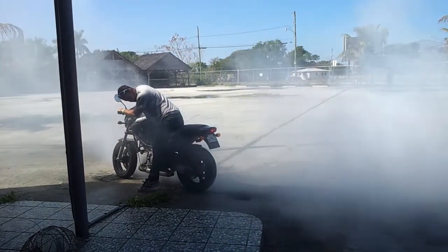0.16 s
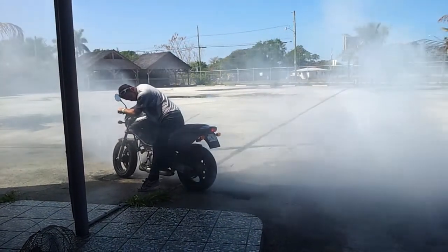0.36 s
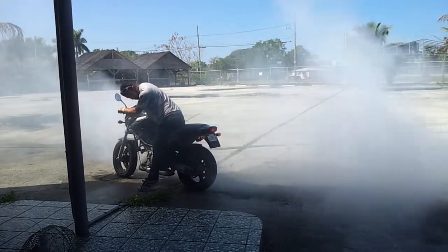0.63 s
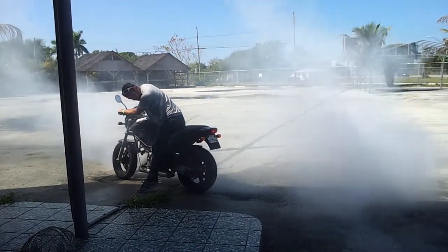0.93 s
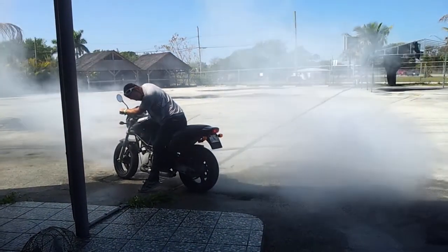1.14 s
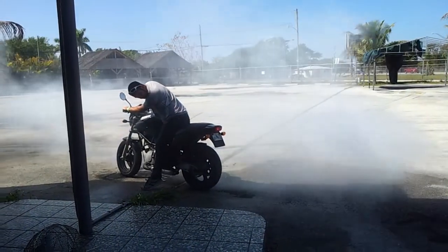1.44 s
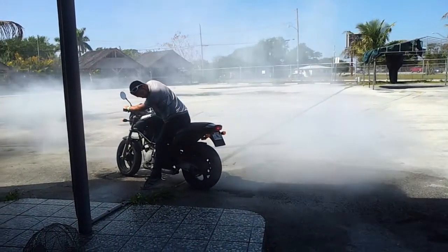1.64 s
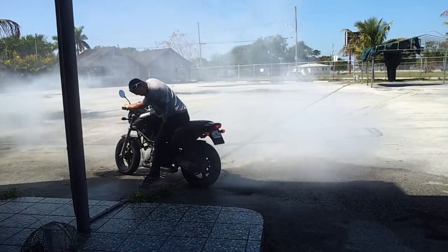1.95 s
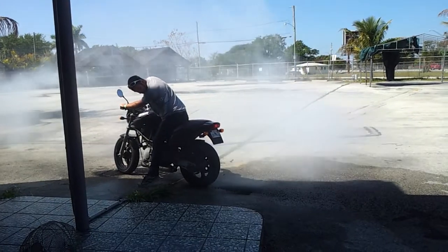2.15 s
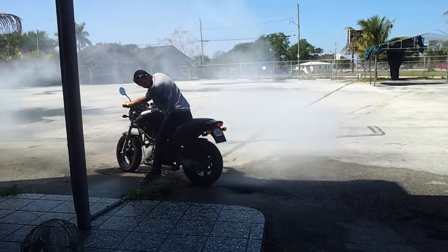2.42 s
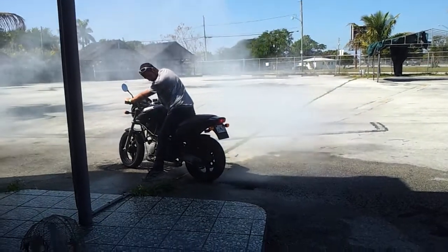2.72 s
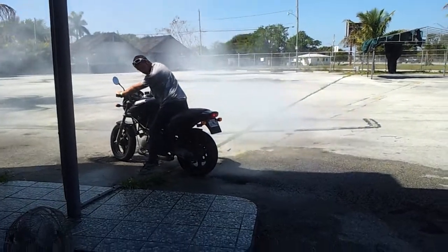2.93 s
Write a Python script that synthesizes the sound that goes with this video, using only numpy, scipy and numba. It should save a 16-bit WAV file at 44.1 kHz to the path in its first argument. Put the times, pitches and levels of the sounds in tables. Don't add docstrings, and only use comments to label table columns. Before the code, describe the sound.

A big motorcycle engine falls from a loud rev, with hollow exhaust drone and metallic clatter, then settles to an uneven thumping idle with small pops; close outdoor small-camera microphone, peaks distorting.

```python
import sys
import numpy as np
from scipy import signal
from scipy.fft import rfft, irfft
from scipy.io import wavfile
from scipy.ndimage import uniform_filter1d
from numba import njit

SR = 44100
rng = np.random.default_rng(int(sys.argv[2]) if len(sys.argv) > 2 else 0)


def how_loud(loudness_db):
    steps = np.asarray(loudness_db, float) / 20
    return 10 ** steps


def int16_out(signal):
    q = np.round(np.clip(np.atleast_2d(signal).T, -1, 1) * 32767)
    wavfile.write(sys.argv[1], SR, q.astype(np.int16))


N = 135828

# time_s, case_noise_db, burble_db, gas_hiss_db
EFFORT = [
    (0.0, -14.5, -2.5, -33),
    (.22, -20, -14, -35),
    (.45, -21, -14.5, -42),
    (.7, -23, -16, -46),
    (1.0, -22.5, -18.5, -57.5),
    (1.42, -25.5, -22, -63),
    (2.2, -25.5, -24.5, -72),
    (3.08, -23.5, -21.5, -95),
]
# centre_hz, width_hz, level_db
BURBLE_RESONANCES = [(76.8, 38.6, -6), (100.6, 14, -9), (168.8, 20.5, -2.5), (243.6, 35.7, -14.5),
                     (305.5, 37, -10.5)]
# centre_hz, width_hz, level_db
CASE_RESONANCES = [(545.4, 29, 11.5), (646.3, 61, 4), (703.5, 122, 4), (1380, 560, -4.5), (1904, 883, -4.5),
                   (2936, 1800, -27.5), (3954, 300, -10)]
# frequency_hz, density_db (per Hz)
CASE_NOISE = [(250, -27), (380, -16.5), (550, -1.5), (990, -8), (2040, -17.5), (2900, -25), (4340, -19),
              (7300, -30.5), (10000, -47)]
# time_s (peak 2.5 ms later), level_db, brightness_db
EARLY_PUFFS = [(0.0126, -26, 21), (0.0586, -29, 10), (0.0857, -17.5, 26), (0.142, -19.5, 25),
               (0.173, -19, 28), (0.2144, -29, 19), (0.258, -20.5, 25), (0.298, -25, 12), (0.3669, -26, 19),
               (0.45, -18.5, 26), (0.521, -19.5, 24.5), (0.565, -24.5, 27), (0.6294, -28, 6),
               (0.6757, -19, 23), (0.719, -27, -5), (0.763, -24.5, 24), (0.847, -17.5, 19),
               (0.938, -19, 26), (0.957, -23.5, 30), (1.034, -24.5, -43), (1.0524, -26, -25),
               (1.066, -27, -26), (1.1333, -25, 14), (1.1694, -27, -16), (1.2357, -23, -19),
               (1.2958, -22, -24), (1.345, -22.5, 17), (1.404, -33, -17), (1.455, -19.5, -14),
               (1.517, -28, -22)]
# time_s (peak 2.5 ms later), level_db, brightness_db
LATE_PUFFS = [(1.566, -26.5, -13), (1.632, -24, -24), (1.6795, -27, -16), (1.752, -33, 4),
              (1.7988, -27.5, -9), (1.8698, -17.5, 15), (1.918, -23, -9), (2.04, -18, 11),
              (2.0544, -34, -14), (2.105, -19.5, 12), (2.1522, -20, -25), (2.2132, -25.5, -23),
              (2.226, -31.5, -15), (2.2718, -17, 15), (2.385, -22.5, 12), (2.4506, -23.5, -20),
              (2.4927, -34.5, 7), (2.5034, -23.5, 8), (2.6195, -23, 18), (2.6858, -19, -26),
              (2.736, -19, -33), (2.8504, -22, -17), (2.919, -20.5, -15), (2.969, -22.5, -30),
              (3.023, -29, 0)]
# centre_hz, width_hz, level_db
PUFF_COLOUR = [(1450, 270, 6.5), (1959, 130, 8), (3400, 200, -10), (4300, 380, 0), (4200, 2200, -7),
               (6330, 1530, -7.5)]
# start_s, level_db
SLOWING_FIRINGS = [(.018, -5.5), (.045, -4.5), (.069, -5), (.092, -3), (.121, -6), (.146, -5), (.177, 0),
                   (.202, -11), (.234, -6), (.262, -2), (.294, -9), (.323, -6), (.358, -7.5), (.387, -6),
                   (.399, -5), (.416, -7), (.455, -3.5), (.485, -7.5), (.525, -5), (.568, -6.5), (.599, -8)]
# start_s, level_db
SETTLING_FIRINGS = [(0.644, -9), (0.68, -9.5), (0.721, -5.5), (0.768, -16), (0.805, -11), (0.846, -5),
                    (0.856, -11.5), (0.895, -13.5), (0.944, -7), (0.99, -14), (1.032, -4.5), (1.099, -6.5),
                    (1.13, -29), (1.188, -23), (1.238, -4), (1.297, -7.5), (1.342, -17), (1.406, -6.5),
                    (1.455, -7), (1.518, -10), (1.565, -11.5), (1.633, -7), (1.673, -11)]
# start_s, level_db
IDLE_FIRINGS = [(1.755, -39), (1.802, -9.5), (1.871, -4), (1.919, -18), (1.993, -11), (2.041, -6),
                (2.108, -6.5), (2.163, -11), (2.223, -6.5), (2.273, -6), (2.333, -15), (2.393, -18),
                (2.454, -6.5), (2.504, -6), (2.566, -12), (2.619, -15.5), (2.688, -5), (2.738, -9.5),
                (2.801, -14), (2.853, -8), (2.92, -6.5), (2.968, -9), (3.033, -13.5)]
# delay_ms, level_db
REFLECTIONS = [(0, 0), (9.6, -4), (15.6, -0.5), (21.8, -3), (27.8, -2.5), (39.6, -6.5), (44, -25),
               (55.5, -20), (62, -8)]
# pitch_hz, level_db, t60_s, rise_hz_per_s
CHAMBERS = [(69, -7.5, 0.16, 1), (167, -45, 0.036, 1.5), (292, -14, .2, 1000), (565, -20, 0.1, 0),
            (586, -46, 0.15, 0)]
# time_s, pitch_hz, ring_db, reflections_db
CHAMBER_SONG = [
    (0, 166, -2.5, -16),
    (.1, 176, -0.5, -19),
    (.2, 163, 0, -18),
    (.3, 156.4, -0.5, -1),
    (.4, 156, -2.5, -19),
    (.48, 162.7, 0, -12.5),
    (.6, 179.5, 0, -13),
    (.7, 161, -16, -1.5),
    (1.0, 164, -18, -1),
]
# start_s, level_db, pitch_hz
HIGH_PIPE_RINGS = [(1.0335, -23, 3340), (1.2969, -20, 3370), (1.4037, -19, 3320), (1.4525, -19, 3370),
                   (1.8701, -17, 3370), (2.0388, -23, 3310), (2.1056, -14.5, 3420), (2.2126, -22, 3500),
                   (2.2711, -29, 3530), (2.5028, -21, 3400), (2.6852, -18, 3270), (2.7352, -37, 3320),
                   (2.9181, -19, 3320)]
# start_s, level_db, pitch_hz
LOW_PIPE_RINGS = [
    (0.8454, -29, 2080),
    (1.2347, -19, 1910),
    (1.4525, -26, 2000),
    (2.1516, -10.5, 1960),
    (2.383, -12, 2050),
    (2.452, -17, 2110),
    (2.6852, -10, 1910),
    (2.9181, -26, 1900),
    (2.9696, -15, 2000),
]
# start_s, level_db
AFTERFIRE = [
    (1.8338, -15),
    (1.929, -15),
]
# frequency_hz, threshold_db (per bin)
MUTE_THRESHOLD = [(6300, -22), (7000, -19.5), (8500, -19), (10000, -19.5), (11300, -20.5), (13000, -24),
                  (14800, -18.5)]

TOP_HZ = 15700


@njit
def svf(x, hz, width):
    out = np.empty(len(x))
    band, low = 0., 0.
    g, k = np.tan(np.pi * hz / SR), width / hz
    for i in range(len(x)):
        v = (band + g * (x[i] - low)) / (1 + g * (g + k))
        band = 2 * v - band
        low = low + 2 * g * v
        out[i] = k * v
    return out


def unit(x):
    return x / np.sqrt(np.mean(x ** 2))


def resonate(x, table):
    total = np.zeros(len(x))
    for hz, width, db in table:
        once = svf(x, 1. * hz, 1.42 * width)
        total += how_loud(db) * svf(once, 1. * hz, 1.42 * width)
    return total


def spikes(start_s, level_db):
    out = np.zeros(N)
    at = np.clip((np.asarray(start_s) * SR).astype(int), 0, N - 1)
    np.add.at(out, at, how_loud(level_db))
    return out


def ring(x, kernel):
    return signal.fftconvolve(x, kernel)[:N]


def decay(s, t60_s):
    return 1000. ** (-s / t60_s)


def scatter(per_s, spread_db):
    chance, sign, size = rng.random((3, N))
    clicks = (chance < per_s / SR) * np.sign(sign - .5)
    return unit(clicks * how_loud(-spread_db * np.log(size + 1e-9)))


def walk(rate_hz):
    hold = int(SR / rate_hz)
    steps = np.repeat(rng.standard_normal(N // hold + 1), hold)
    return 1.64 * uniform_filter1d(uniform_filter1d(steps, hold), hold)[:N]


def effort(column):
    table = np.array(EFFORT)
    return how_loud(np.interp(np.arange(N) / SR, table[:, 0], table[:, column]))


def burble():
    fuel_pops = scatter(per_s=220, spread_db=1.0)
    return effort(column=2) * unit(resonate(fuel_pops, BURBLE_RESONANCES))


def cases(fire):
    beat_s, beat_depth = 0.016, 0.27
    clatter_db, broad_db = -6.5, 6.5
    s = np.arange(SR // 5) / SR
    swell = s / beat_s * np.exp(1 - s / beat_s)
    beat = ring(fire, swell) / effort(column=1)
    clatter = scatter(per_s=400, spread_db=2)
    drive = unit(rng.standard_normal(N) + how_loud(clatter_db) * clatter)
    hz, table = np.fft.rfftfreq(N, 1 / SR), np.array(CASE_NOISE)
    colour = how_loud(np.interp(np.log(hz + 1), np.log(table[:, 0]), table[:, 1], left=-60, right=-80))
    broad = unit(irfft(rfft(drive) * colour, N))
    body = unit(resonate(drive, CASE_RESONANCES)) + how_loud(broad_db) * broad
    unevenness = how_loud(0.74 * walk(13) + 0.85 * walk(70))
    return effort(column=1) * unit(body * (1 + beat_depth * unit(beat)) * unevenness)


def jet():
    top_fade_db_per_s = 13
    noise = rng.standard_normal(N)
    top = resonate(noise, [(11100, 1700, -6), (12900, 4600, 4)])
    top *= how_loud(-top_fade_db_per_s * np.arange(N) / SR)
    hiss = unit(resonate(noise, [(7700, 5300, 7.8)]) + top)
    flutter = how_loud(2.0 * walk(35) + 1.8 * walk(90))
    return effort(column=3) * hiss * flutter


def puffs():
    rise_s, peak_s, fall_s, tail_s = .003, .0025, 0.0021, 0.011
    tail_db, air_db, puff_db = 7.5, -38, -3
    time_s, level_db, brightness_db = np.array(list(EARLY_PUFFS) + list(LATE_PUFFS)).T
    s = np.arange(SR // 8) / SR - 3 * rise_s
    swell = np.exp(-.5 * (s / rise_s) ** 2)
    fall = np.exp(-s / fall_s) + how_loud(tail_db) * np.exp(-s / tail_s)
    shape = np.where(s < 0, swell, fall / (1 + how_loud(tail_db)))
    start_s = time_s + peak_s - 3 * rise_s
    hiss = unit(svf(resonate(rng.standard_normal(N), PUFF_COLOUR), 4280.0, 7700.0))
    air = unit(resonate(rng.standard_normal(N), [(12600, 4000, 0)]))
    hiss_gain = ring(spikes(start_s, level_db), shape)
    air_gain = ring(spikes(start_s, level_db + brightness_db + air_db), shape)
    return how_loud(puff_db) * (hiss * hiss_gain + air * air_gain)


def exhaust(firings):
    doublet_ms, lead_ms, ring_start_ms = 1.4, 5.0, 3.5
    thump_db = -2
    ms = np.arange(SR // 4) / SR * 1000

    def doublet(delay_ms, db):
        u = (ms - lead_ms - delay_ms) / doublet_ms
        return how_loud(db) * u * np.exp(.5 - u ** 2 / 2)

    direct, *later = [doublet(delay_ms, db) for delay_ms, db in REFLECTIONS]
    s = np.maximum(ms - ring_start_ms, 0) / 1000
    for hz, db, t60_s, rise in CHAMBERS:
        gliding_hz = hz + rise * np.minimum(s, .12) / 2
        direct = direct + how_loud(db) * np.sin(2 * np.pi * gliding_hz * s) * decay(s, t60_s)
    start_s, level_db = firings.T
    song = np.array(CHAMBER_SONG)
    reflected_db = level_db + np.interp(start_s, song[:, 0], song[:, 3])
    thumps = ring(spikes(start_s, level_db), direct)
    reflections = ring(spikes(start_s, reflected_db), sum(later))
    return how_loud(thump_db) * (thumps + reflections)


def drone(firings):
    start_delay_s, reset_s, t60_s = .002, .003, 0.3
    t, song = np.arange(N) / SR, np.array(CHAMBER_SONG)
    start = firings[:, 0] + start_delay_s
    last = np.clip(np.searchsorted(start, t) - 1, 0, len(start) - 2)
    s = np.maximum(t - start[last], 0)
    fade = np.clip((start[last + 1] - t) / reset_s, 0, 1)
    hz = np.interp(start, song[:, 0], song[:, 1])
    db = firings[:, 1] + np.interp(start, song[:, 0], song[:, 2], right=-60)
    return -how_loud(db[last]) * np.sin(2 * np.pi * hz[last] * s) * decay(s, t60_s) * fade


def tones(rows, t60_s, rise_s):
    out = np.zeros(N + SR)
    s = np.arange(SR // 5) / SR
    envelope = decay(s, t60_s) * (1 - np.exp(-s / rise_s))
    for start_s, db, hz in rows:
        i = int(start_s * SR)
        out[i:i + len(s)] += how_loud(db) * np.sin(2 * np.pi * hz * s) * envelope
    return out[:N]


def pipe_end():
    rows = np.array(list(HIGH_PIPE_RINGS) + list(LOW_PIPE_RINGS))
    split, level_db = .03, -5
    lower = tones(rows * [1, 1, 1 - split], t60_s=.04, rise_s=.003)
    upper = tones(rows * [1, 1, 1 + split], t60_s=.04, rise_s=.003)
    return how_loud(level_db) * (lower + upper)


def pops():
    pitch_hz, t60_s = 720, 0.024
    s = np.arange(SR // 20) / SR
    start_s, level_db = np.array(AFTERFIRE).T
    return ring(spikes(start_s, level_db), np.sin(2 * np.pi * pitch_hz * s) * decay(s, t60_s))


def scene():
    bass_loss, bass_back_s = 0.85, 0.76
    firings = np.array(list(SLOWING_FIRINGS) + list(SETTLING_FIRINGS) + list(IDLE_FIRINGS))
    fire = spikes(firings[:, 0], firings[:, 1])
    pipe = burble() + exhaust(firings)
    damping = bass_loss * np.clip(1 - np.arange(N) / SR / bass_back_s, 0, 1) ** .5
    pipe = pipe - damping * svf(pipe, 87.0, 58.0)
    mix = pipe + cases(fire) + jet() + puffs() + drone(firings) + pipe_end() + pops()
    return mix[None]


def mute(x):
    frame, offset = 1024, 752
    from_hz, band_hz, scatter_db = 6300, 690, 2.5
    mask_share, mask_from_db = .3, -17.5
    padded = np.pad(x, (2 * frame - offset, 2 * frame))
    window = np.sin(np.pi * (np.arange(2 * frame) + .5) / (2 * frame))
    at = np.arange(0, len(padded) - 2 * frame, frame)[:, None] + np.arange(2 * frame)
    frames = padded[at] * window
    spec, hz = rfft(frames), np.fft.rfftfreq(2 * frame, 1 / SR)
    loudness_db = 10 * np.log10(np.mean(frames ** 2, axis=1) * 2 + 1e-9)
    masking_db = mask_share * (loudness_db - mask_from_db)
    table = np.array(MUTE_THRESHOLD)
    for low in np.arange(from_hz, TOP_HZ + band_hz, band_hz):
        band = (hz >= low) & (hz < low + band_hz)
        threshold_db = np.interp(low, table[:, 0], table[:, 1]) + masking_db
        threshold = how_loud(threshold_db + scatter_db * rng.standard_normal(len(at)))
        level = np.sqrt(np.mean(np.abs(spec[:, band]) ** 2, axis=1))
        spec[:, band] *= (level > threshold)[:, None]
    out = np.zeros(len(padded))
    np.add.at(out, at, irfft(spec) * window)
    return out[2 * frame - offset:][:N]


def band_limit(x):
    return signal.sosfilt(signal.butter(12, 15700, fs=SR, output="sos"), x)


def record(dry):
    low_cut = signal.butter(4, 49, "high", fs=SR, output="sos")
    top_cut = signal.ellip(8, .2, 70, TOP_HZ, fs=SR, output="sos")
    thinned = signal.sosfiltfilt(low_cut, dry)
    clipped = np.clip(thinned, -1.0, 1.0)
    limited = signal.sosfilt(top_cut, clipped)
    return band_limit(mute(limited[0])[None])


dry = scene()
out = record(dry)
int16_out(out)
```